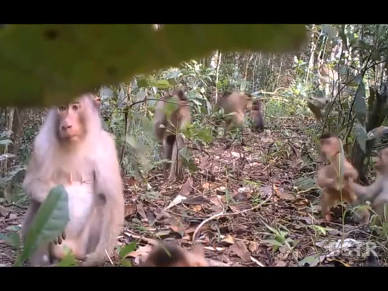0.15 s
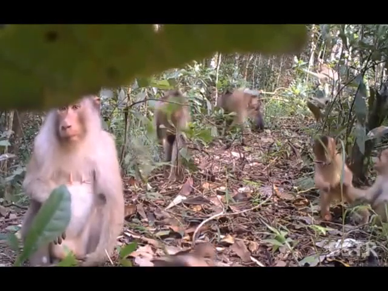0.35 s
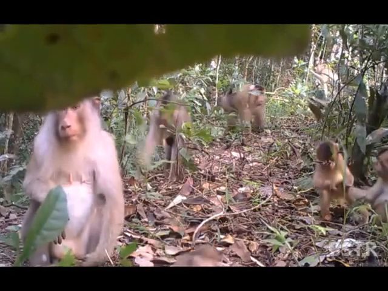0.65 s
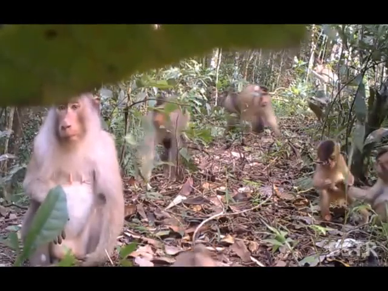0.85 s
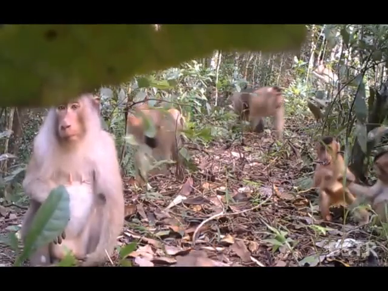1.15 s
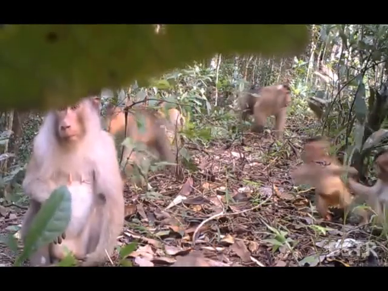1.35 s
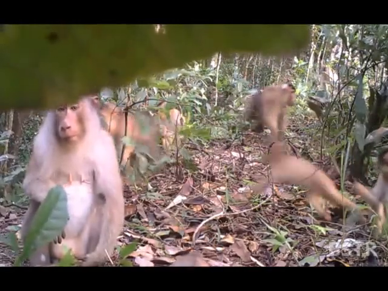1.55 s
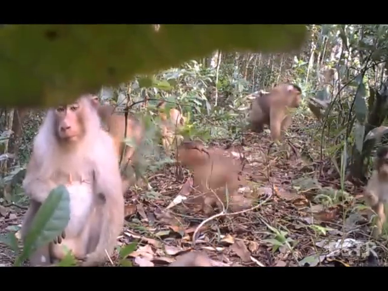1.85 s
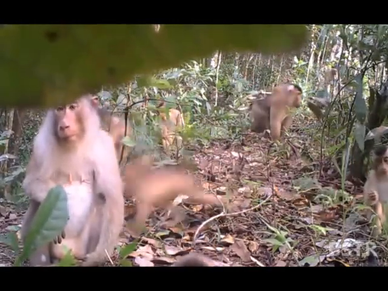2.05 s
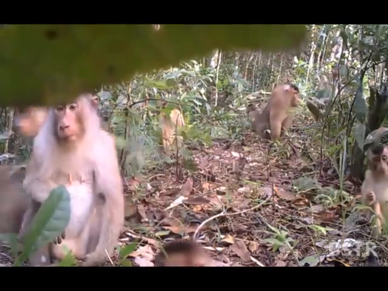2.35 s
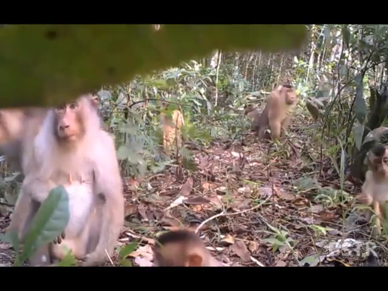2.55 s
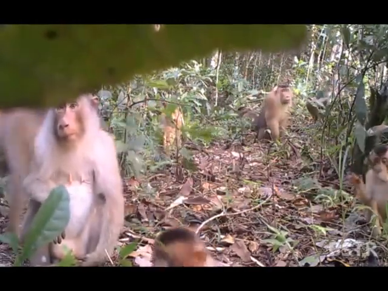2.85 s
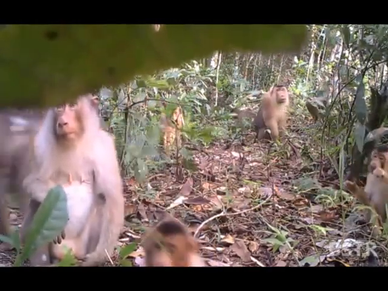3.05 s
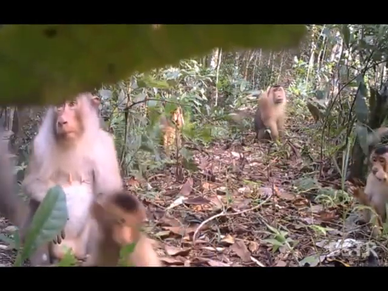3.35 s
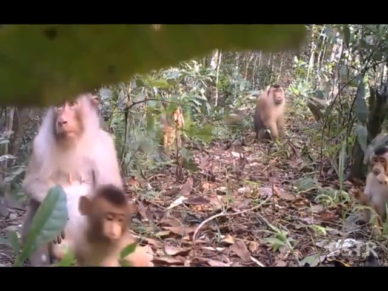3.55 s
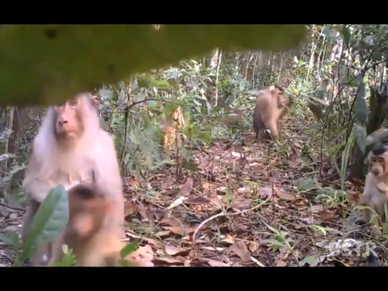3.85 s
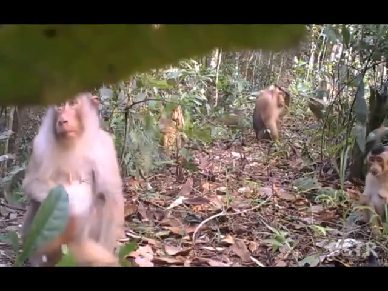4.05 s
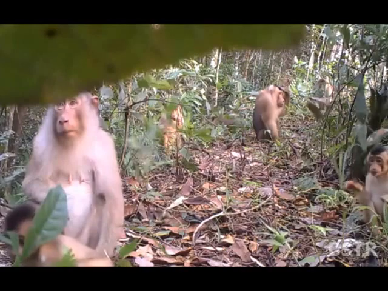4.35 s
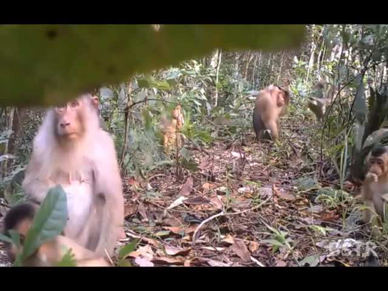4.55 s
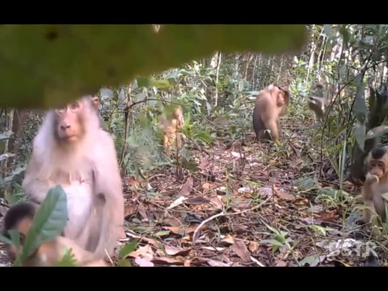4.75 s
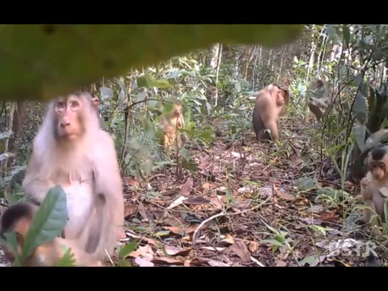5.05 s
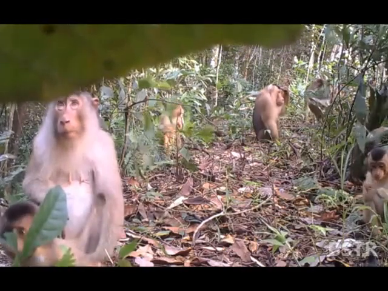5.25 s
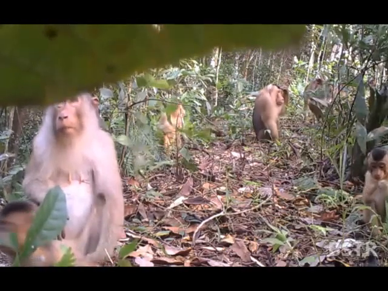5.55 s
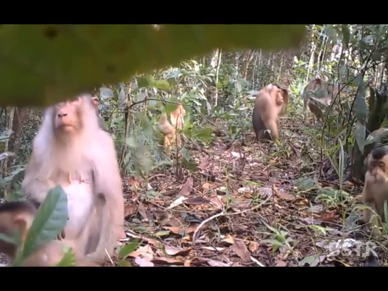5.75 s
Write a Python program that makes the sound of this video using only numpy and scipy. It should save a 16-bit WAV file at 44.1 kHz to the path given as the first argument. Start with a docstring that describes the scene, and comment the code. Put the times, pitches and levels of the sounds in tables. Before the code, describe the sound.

In a tropical forest, a nearly steady hiss of insects and foliage holds throughout with quick, pure descending chirps ringing among the trees. Near the low microphone, leaf rustling is busiest at first, thins, then returns with crunches and snaps around two seconds and a strongest crack near four. Footfalls are soft; air rumbles faintly.

```python
"""A troop of macaques moves over dry leaf litter in a tropical forest, heard from close to the ground.
From the start, filtered noise makes air rumble on the microphone and a nearly steady hiss of insects and foliage.
A bird repeats a short falling whistle with echoes off the trunks, while dense random clicks make leaves shuffle.
Twigs soon snap, as noise cracks with ringing stems; then feet thud softly on soil, as damped low noise.
After about a second, short bursts of clicks add the crunch of crushed leaves."""
import sys
import numpy as np
from scipy import signal
from scipy.fft import rfft, irfft
from scipy.io import wavfile
from scipy.ndimage import uniform_filter1d

SR = 44100
rng = np.random.default_rng(int(sys.argv[2]) if len(sys.argv) > 2 else 0)


def dump_mix(stems):
    """Bounce the given channels to the path in sys.argv[1] as a 16-bit WAV at rate SR."""
    frames = np.atleast_2d(stems).T  # one column per channel
    limited = np.clip(frames, -1, 1)  # hard clip at full scale
    pcm = np.round(limited * 32767).astype(np.int16)
    wavfile.write(sys.argv[1], SR, pcm)


N = 261072  # length in samples
TIME = np.arange(N) / SR  # seconds


def undb(db):
    """Turn decibels into a gain."""
    return 10 ** (np.asarray(db) / 20)


def unit(x):
    """Scale a sound to an average strength (rms) of one."""
    return x / np.sqrt(np.mean(x ** 2) + 1e-18)


def add(out, start, x):
    """Mix x into out from a start in seconds; anything outside out is cut off."""
    i = int(round(start * SR))
    x, i = x[max(-i, 0):], max(i, 0)
    out[i:i + len(x)] += x[:max(len(out) - i, 0)]


def colour(x, points):
    """Shape the spectrum of x along points of (Hz, dB); rms one."""
    hz, db = np.transpose(points)
    f = np.fft.rfftfreq(len(x), 1 / SR) + 1  # one Hz up, to avoid log(0)
    gain = undb(np.interp(np.log(f), np.log(hz), db))
    return unit(irfft(rfft(x) * gain, len(x)))


def band(x, hz, octaves):
    """Keep a bell-shaped band around hz that leans toward the low side; rms one."""
    f = np.fft.rfftfreq(len(x), 1 / SR) + 1
    bell = 1 / (1 + (np.log2(f / hz) / octaves) ** 2)
    lean = np.sqrt(hz / (f + 2 * hz))
    return unit(irfft(rfft(x) * bell * lean, len(x)))


def walk(rate):
    """A smooth random drift with a spread near one, drawing 'rate' new values a second."""
    k = int(SR / rate)
    steps = np.repeat(rng.standard_normal(N // k + 1), k)
    return unit(uniform_filter1d(steps, k)[:N])


def crackle(count, per_s, spread_db):
    """Tiny fractures at random moments: many weak, a few strong."""
    hit = rng.random(count) < per_s / SR
    sign = rng.choice([-1, 1], count)
    strength = undb(spread_db * np.minimum(rng.exponential(size=count), 5))
    return hit * sign * strength


def trunks(x, t60, wet_db, per_s):
    """Add echoes scattered by trunks and foliage, fading by 60 dB in t60 seconds."""
    t = TIME[:int(SR * t60)]
    echoes = crackle(len(t), per_s, 2.1) * undb(-60 * t / t60) * (t > .004)
    response = undb(wet_db) * unit(echoes) / np.sqrt(len(t))
    response[0] = 1  # the direct sound
    return signal.fftconvolve(x, response)[:N]


def leaf(x, low_hz, high_hz, patchy_db):
    """A dry leaf radiates between two edges, with its own uneven resonances; rms one."""
    hz = np.geomspace(100, 18000, 48)
    edges = -10 * np.log10((1 + (low_hz / hz) ** 6) * (1 + (hz / high_hz) ** 8))
    uneven = patchy_db * rng.standard_normal(len(hz))
    return colour(x, np.column_stack([hz, edges + uneven]))


def swell(start, length, attack, release):
    """A gesture rises from its start, holds to the end of its length and dies away (all in seconds)."""
    rise = np.clip((TIME - start) / attack, 0, 1)
    return rise * np.exp(-np.maximum(TIME - start - length, 0) / release)


def air():
    """Slow eddies press on the microphone, harder in each puff."""
    # Puffs of air. Each row: start in seconds, length in seconds, level in dB.
    puffs = [(-.05, 0.36, -22), (1.118, 0.32, -21), (1.504, 0.36, -27.5), (3.46, 0.11, -26),
             (4.87, 0.16, -24), (5.366, 0.13, -19.5)]
    # Spectrum of the eddies. Each row: frequency in Hz, relative level in dB per Hz.
    eddy_spectrum = [(2, -6), (6, -2), (14, -0.5), (22, -5.5), (32, -15), (60, -24.5), (100, -40.5),
                     (180, -47), (400, -79)]
    calm_db = -29.5
    power = undb(calm_db) ** 2
    for start, length, db in puffs:
        push = undb(db) * swell(start, length, attack=0.09, release=.1)
        power = power + push ** 2
    eddies = colour(rng.standard_normal(N), eddy_spectrum) * np.sqrt(power)
    # the open air also carries a steady low rumble
    rumble = band(rng.standard_normal(N), hz=70.6, octaves=0.93) * undb(-43.5)
    return eddies + rumble


def forest():
    """Distant foliage and insects blend into a smooth hiss whose level drifts slightly."""
    # Spectrum of the hiss. Each row: frequency in Hz, relative level in dB per Hz.
    hiss_spectrum = [(80, 0), (170, 3), (450, 3), (700, -1), (1000, 0), (1400, 1), (2000, -1.5),
                     (3700, -1.5), (5300, -1.6), (8000, -5), (11000, -9.5), (14000, -11), (15600, -20)]
    level_db = -39.5 + 0.64 * walk(3.02)
    return colour(rng.standard_normal(N), hiss_spectrum) * undb(level_db)


def bird():
    """A pure whistle drops an octave, then lingers softly at the bottom."""
    # Chirps. Each row: start in seconds, level in dB before a fixed 3.5 dB lift,
    # level of the held end note in dB relative to the chirp, before a fixed 2 dB cut.
    chirps = [(-.006, -28.5, -27), (.411, -29.5, -24), (.929, -26.5, -20), (1.278, -27, -24),
              (1.612, -26.5, -14.5), (1.961, -28.5, -25), (2.300, -25.5, -14), (2.646, -26.5, -16),
              (2.985, -27.5, -12.5), (3.327, -27.5, -12.5), (3.657, -26.5, -14.5), (4.032, -28, -18),
              (4.383, -28, -13), (4.728, -28, -15), (5.075, -27, -15), (5.558, -27.5, -15),
              (5.901, -28, -13)]
    # The fall of one chirp. Each row: age in seconds, pitch in Hz before a slight waver, relative level in dB.
    sweep = [(0, 2527, -9.5), (.0058, 2332, -3.5), (0.0113, 2105, -4.5), (.017, 1909, -11),
             (.027, 1612, -15), (.039, 1310, -30)]
    # Early bounces off the ground and the nearest trunk. Each row: delay in seconds, level in dB.
    bounces = [(.00374, -9.5), (.0072, -13.5)]
    end_note_hz = 1280
    out, t = np.zeros(N), TIME[:SR // 8]
    age, pitch_hz, sweep_db = np.transpose(sweep)
    pitch_age = np.append(age, age[-1] + 0.0071)
    pitch_hz = np.append(pitch_hz, end_note_hz)
    for start, db, end_db in chirps:
        a = t / (1 + .04 * rng.standard_normal())  # each chirp is a little longer or shorter
        offset = 0.01 * rng.standard_normal()
        waver = offset + 0.013 * band(rng.standard_normal(len(t)), hz=83, octaves=0.4)
        hz = np.interp(a, pitch_age, pitch_hz) * (1 + waver)
        fade_in = np.clip(a / age[1] * 2, 0, 1)
        fade_out = np.clip((age[-1] - a) / .006 + 1, 0, 1)
        fall = undb(np.interp(a, age, sweep_db)) * fade_in * fade_out
        hold = undb(end_db - 2) * np.exp(-((a - .056) / 0.017) ** 2)
        tone = np.sin(2 * np.pi * np.cumsum(hz) / SR)
        whistle = undb(db + 3.5) * (fall + hold) * tone
        # the bounces overlap the falling pitch and beat with it
        echoes = sum(undb(echo_db) * np.interp(t - lag, t, whistle, left=0) for lag, echo_db in bounces)
        # foliage smears each chirp, and the forest rings on
        blurred = trunks(whistle + echoes, t60=0.35, wet_db=-4.5, per_s=4500)
        add(out, start, trunks(blurred, t60=0.64, wet_db=-5.5, per_s=4500))
    return out


def shuffle():
    """Leaves slide over each other as a dense crackle that swells with each stride, with a dull scuff."""
    # Strides through the litter. Each row: start in seconds, length in seconds, level of the crisp crackle
    # in dB, level of the dull scuff in dB relative to the crackle.
    strides = [(.01, 0.2, -35, -2.5), (0.223, .25, -33.5, -2.5), (0.515, .2, -43, 0.5),
               (1.002, .08, -43, 1), (1.159, .17, -40.5, -1.5), (1.536, 0.13, -38.5, -7),
               (1.717, 0.12, -40, -3), (1.934, 0.13, -37, -3), (2.029, 0.14, -36.5, -4.5),
               (2.372, 0.071, -38.5, -5.5), (2.664, 0.12, -42, -2), (3.075, 0.086, -41.5, -2),
               (3.77, 0.055, -45, -6), (3.935, .18, -37.5, -0.5), (4.196, 0.2, -40.5, -2),
               (4.39, .16, -37, -5), (4.632, 0.16, -39, -3.5), (4.844, 0.28, -38, -1.5),
               (5.25, 0.07, -41, -8), (5.426, 0.11, -37, -5)]
    # Spectrum of the crisp crackle. Each row: frequency in Hz, relative level in dB per Hz.
    crisp_spectrum = [(1000, -23), (2200, 0.5), (3000, 0.5), (3700, -1.5), (5500, 1), (8000, -2),
                      (11000, -6), (15500, -15.5)]
    # Spectrum of the dull scuff. Each row: frequency in Hz, relative level in dB per Hz.
    scuff_spectrum = [(100, -10), (300, -3), (700, -1), (1400, 2), (2200, -3), (3500, -5.5), (8000, -20)]
    # the rest of the troop keeps the leaves stirring
    stir_db, stir_scuff_db = -43, -4.5  # the scuff is relative to the crackle
    crisp_power = undb(stir_db) ** 2
    scuff_power = undb(stir_db + stir_scuff_db) ** 2
    for start, length, db, scuff_db in strides:
        push = undb(db) * swell(start, length, attack=0.032, release=0.05)
        crisp_power = crisp_power + push ** 2
        scuff_power = scuff_power + (push * undb(scuff_db)) ** 2
    # several patches of leaves take turns, each with its own colour
    patches = np.zeros(N)
    for _ in range(6):
        turn = undb(3.0 * walk(22))
        patches += turn * leaf(crackle(N, per_s=1400, spread_db=2.5), 540, 14500, patchy_db=2.5)
    crisp = colour(patches, crisp_spectrum) * np.sqrt(crisp_power)
    scuff = colour(crackle(N, per_s=1600, spread_db=2.5), scuff_spectrum) * np.sqrt(scuff_power)
    flutter = undb(1.35 * walk(60))
    return (crisp + scuff) * flutter


def snaps():
    """Twigs and leaf ribs break with a sharp crack and a brief ring of the broken stem."""
    # Loud snaps. Each row: start in seconds, peak level in dB, ring pitch in Hz.
    loud = [(.021, -16.5, 2390), (.45, -18, 5000), (1.301, -23, 8850), (1.503, -15.5, 5640),
            (1.97, -15.5, 2150), (1.983, -13, 1550), (1.997, -14.5, 1585), (2.233, -14.5, 6140),
            (2.34, -21.5, 6650), (3.023, -20, 5700), (3.176, -15, 6530), (3.25, -22, 6940),
            (3.9588, -7.5, 3110), (3.964, -13, 3200), (4.031, -18, 7140), (4.383, -10, 4970),
            (5.112, -19, 2600), (5.73, -20, 4980), (5.768, -16, 5400), (5.793, -15.5, 5570),
            (5.838, -17, 5600)]
    # Ways a snapped stem rings. Each row: multiple of its ring pitch, relative level in dB,
    # time to fade by 60 dB in seconds (shorter for stems above 3200 Hz).
    stem = [(1, 2, 0.032), (1.07, 2, 0.031), (1.42, 0.5, 0.025), (1.72, 1.5, 0.0096), (2.3, 2, 0.011),
            (2.52, -7, 0.012)]
    out, t = np.zeros(N), TIME[:SR // 30]
    # small ribs give way at random between the loud snaps
    ticks = []
    for _ in range(12):
        start = rng.uniform(0, N / SR)
        peak_db = -22 + 2 * rng.standard_normal()
        ring_hz = 4870 * 2 ** (0.376 * rng.standard_normal())
        ticks.append((start, peak_db, ring_hz))
    for start, db, hz in list(loud) + ticks:
        crack = leaf(rng.standard_normal(len(t)), 2274, 11300, patchy_db=9.0) * np.exp(-t / 0.0017)
        # thin, high-pitched stems die away sooner
        haste = max(hz / 3200, 1)
        ring = np.zeros(len(t))
        for multiple, mode_db, t60 in stem:
            if hz * multiple < 12500:
                fade = undb(-60 * t / t60 * haste)
                ring += undb(mode_db) * np.sin(2 * np.pi * hz * multiple * t) * fade
        snap = crack + undb(-1.5) * ring
        add(out, start, undb(db) * snap / np.abs(snap).max())
    return out


def thuds():
    """The soil answers a footfall with a low, quickly damped knock."""
    # Soft footfalls. Each row: start in seconds, peak level in dB, pitch in Hz, width in octaves.
    footfalls = [(.221, -29.5, 400, .99), (.678, -30.5, 604, 0.89), (1.04, -30, 448, 1),
                 (1.29, -34, 480, 0.65), (1.975, -26.5, 300, 0.81), (2.125, -27.5, 242, .9),
                 (2.394, -29, 477, .53), (3.143, -31, 550, 1), (3.184, -28.5, 262, 0.24),
                 (3.645, -32.5, 590, .94), (3.96, -29.5, 259, 0.89), (4.737, -32.5, 310, 0.32)]
    out, t = np.zeros(N), TIME[:SR // 5]
    for start, db, hz, octaves in footfalls:
        damping = (1 - np.exp(-t / 0.0048)) * np.exp(-t / 0.01)
        knock = band(rng.standard_normal(len(t)), hz, octaves) * damping
        add(out, start, undb(db) * knock / np.abs(knock).max())
    return out


def crunches():
    """Each step breaks a cluster of leaves: a quick rise, a hold and a short release."""
    # Feet crushing leaves. Each row: start in seconds, length in seconds, level in dB at full press,
    # lower edge in Hz, upper edge in Hz.
    steps = [(1.264, .024, -34, 2490, 6840), (1.809, 0.044, -29, 1240, 9100), (1.956, .022, -34, 900, 9000),
             (1.979, 0.027, -23, 1100, 11600), (2.226, 0.028, -35.5, 5000, 9800),
             (2.762, .035, -35.5, 2160, 5740), (2.813, .02, -34, 3500, 10400),
             (2.994, 0.018, -31.5, 706, 8000), (3.116, .067, -30.5, 500, 11100),
             (3.959, 0.029, -24, 2700, 7600), (4.343, 0.037, -27, 2170, 6600),
             (4.369, .024, -31, 4000, 8000), (4.621, 0.0092, -30.5, 1490, 7050),
             (4.646, 0.041, -30, 4980, 14000), (5.564, 0.0068, -30.5, 896, 6960),
             (5.729, .0084, -27.5, 4400, 9570), (5.763, .013, -34, 4500, 10000),
             (5.784, .012, -31, 5000, 12000)]
    out, t = np.zeros(N), TIME[:SR // 6]
    for start, length, db, low_hz, high_hz in steps:
        rise = np.clip(t / (0.13 * length), 0, 1)
        press = rise * np.exp(-np.maximum(t - length * 0.55, 0) / 0.015)
        leaves = leaf(crackle(len(t), per_s=3500, spread_db=3.5), low_hz, high_hz, patchy_db=3.0)
        add(out, start, undb(db) * press * leaves)
    return out


def scene():
    """The ground sounds are close, with only a little forest echo; the other layers join them."""
    background = air() + forest() + bird()
    ground = shuffle() + snaps() + thuds() + crunches()
    ground = trunks(ground, t60=0.16, wet_db=-17.5, per_s=3000)
    return (background + ground)[None]  # one channel


def record(dry):
    """A steep filter cuts the treble above 15600 Hz."""
    top_cut = signal.ellip(10, .2, 80, 15600, fs=SR, output="sos")
    return signal.sosfilt(top_cut, dry)


dry = scene()
out = record(dry)
dump_mix(out)
```